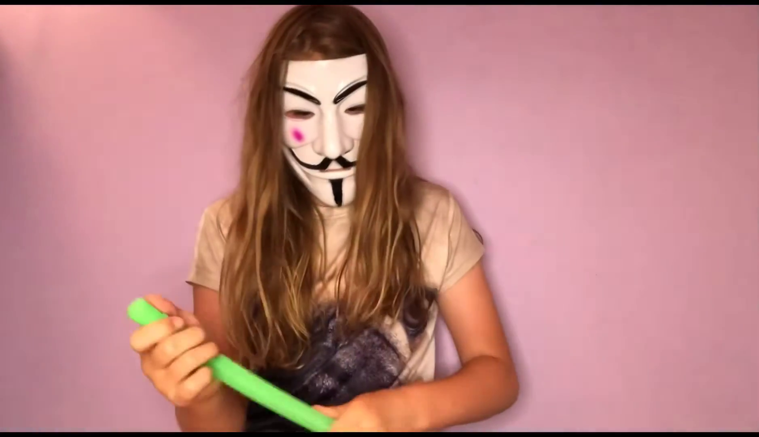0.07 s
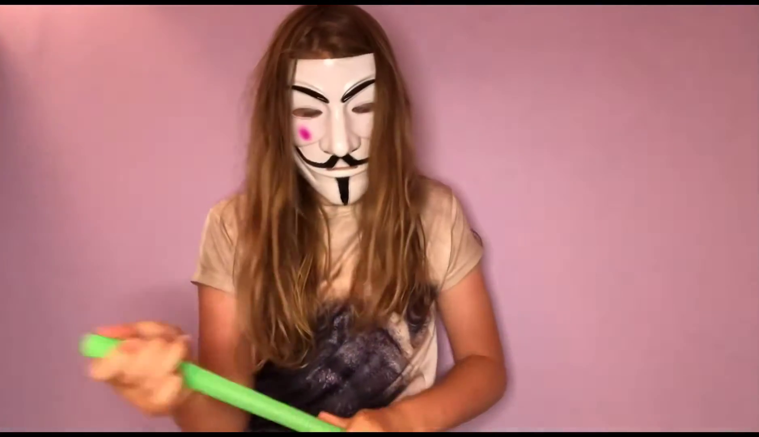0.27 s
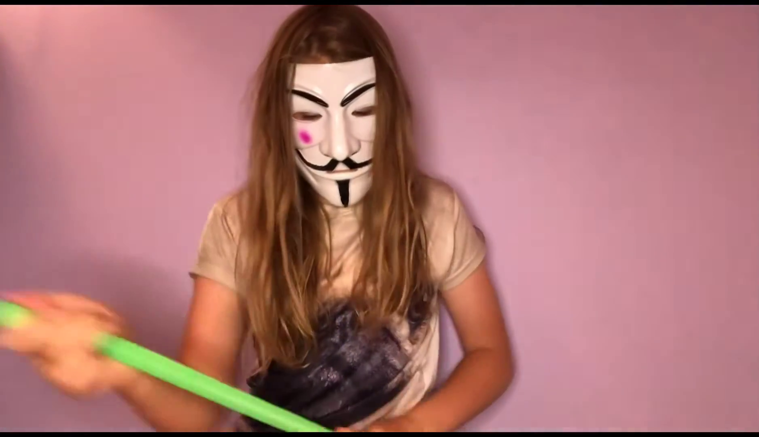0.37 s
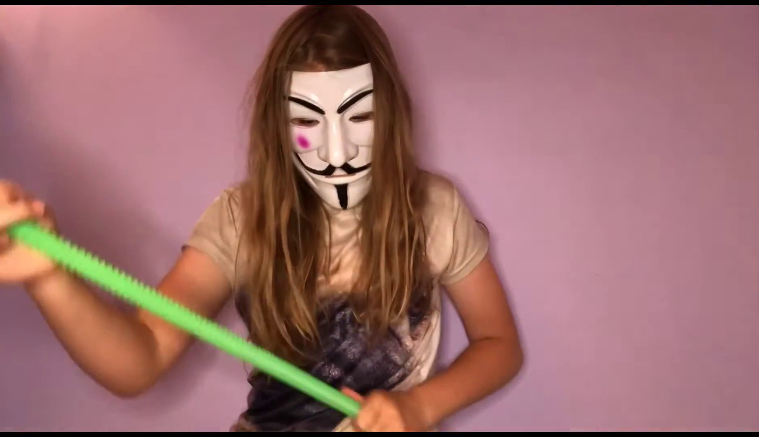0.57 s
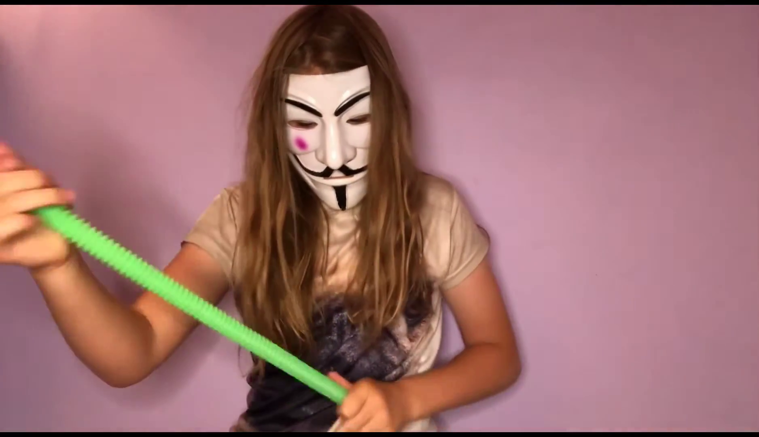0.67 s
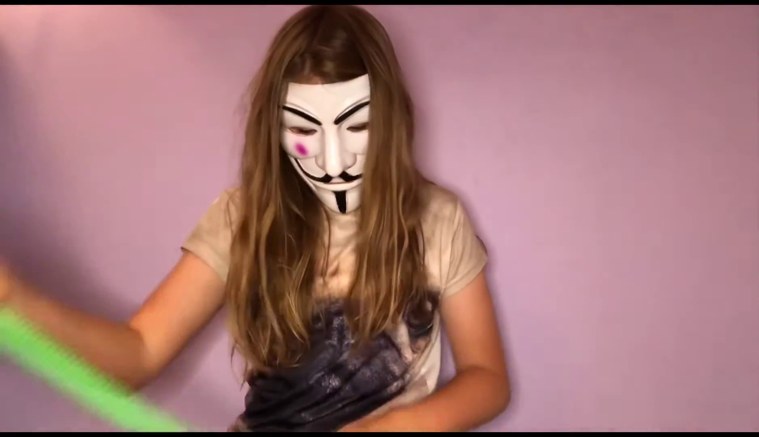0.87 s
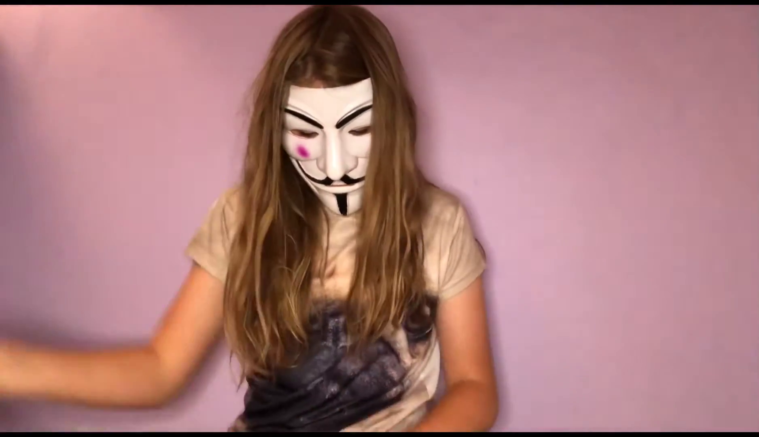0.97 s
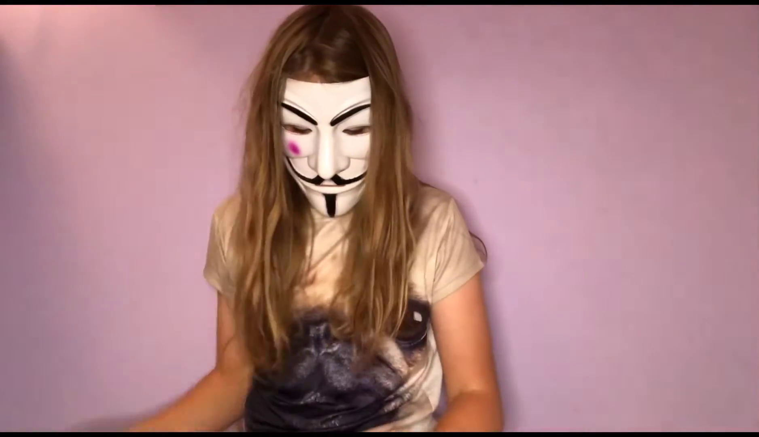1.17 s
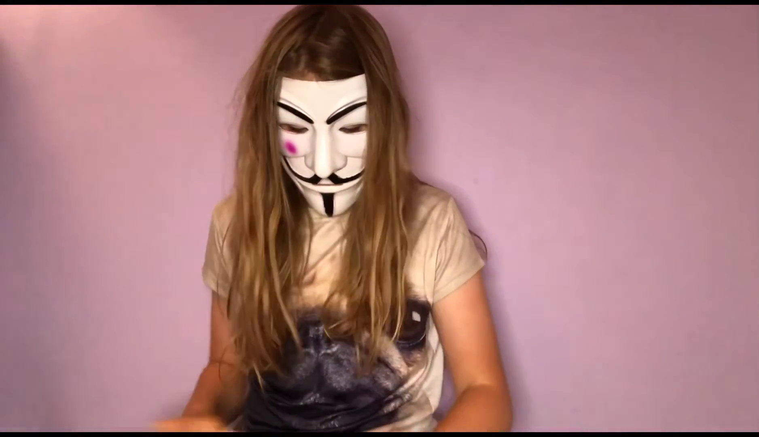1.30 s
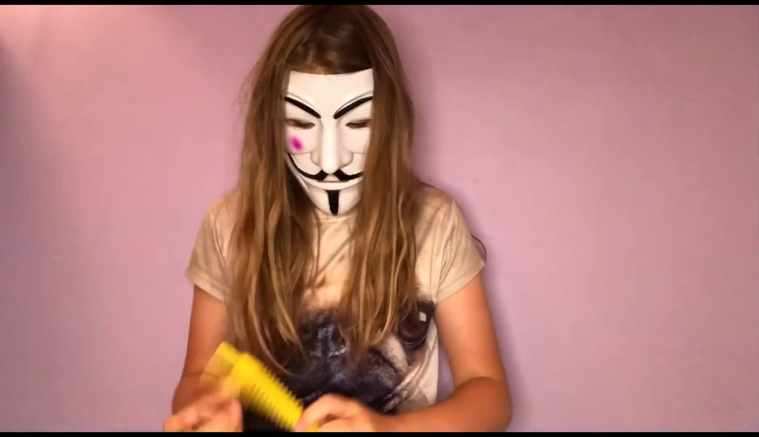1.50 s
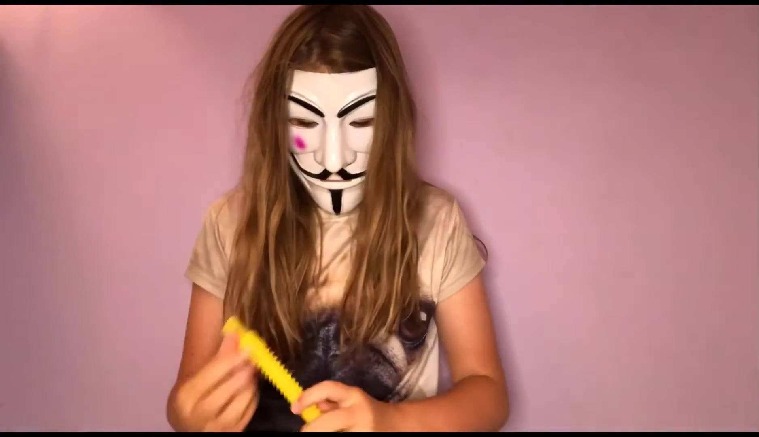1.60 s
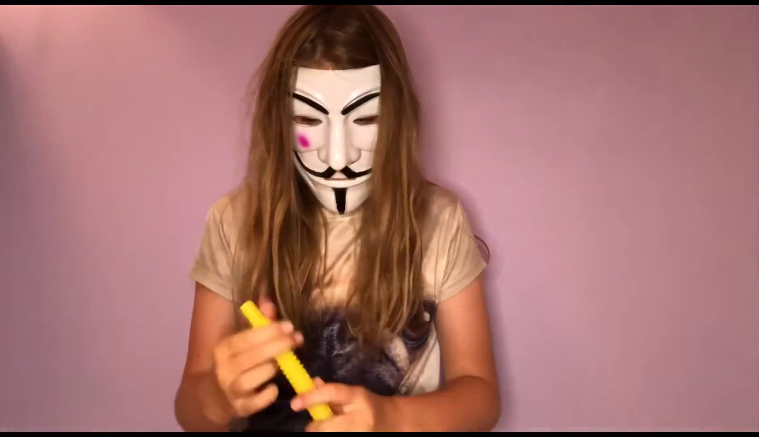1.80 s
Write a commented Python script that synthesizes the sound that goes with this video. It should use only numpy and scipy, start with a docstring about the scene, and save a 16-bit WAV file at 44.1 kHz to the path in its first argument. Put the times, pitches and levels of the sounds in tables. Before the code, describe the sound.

A corrugated plastic tube is yanked open with a fast ratchet and a pop, then faint taps.

```python
"""Small room: a pleated plastic tube is yanked open. Its pleats snap out in a fast ratchet, and each
snap kicks the air column inside, whose pitch falls as the tube lengthens. One late pleat pops alone.
Hands then put the tube down and pick up another: faint taps and rubs. Mains hum and hiss throughout."""
import sys
import numpy as np
from scipy import signal
from scipy.fft import rfft, irfft
from scipy.io import wavfile
from scipy.ndimage import uniform_filter1d

SR = 44100
rng = np.random.default_rng(int(sys.argv[2]) if len(sys.argv) > 2 else 0)


def unload_wav(signal):
    """Save mono or channel-first audio to the path in sys.argv[1] as 16-bit WAV at rate SR, clipped to [-1, 1]."""
    wavfile.write(
        sys.argv[1],
        SR,
        np.round(np.clip(np.atleast_2d(signal).T, -1, 1) * 32767).astype(np.int16),
    )


N = 81585
T = np.arange(N) / SR

# pleats snapping out: t/s, crack level/dB, crack f/Hz, kick to the air column/dB
SNAPS = [(0.2339, 0, 3950, -9.5), (0.2377, -3.5, 3947, -20.5), (0.2508, -15, 2600, 2),
         (0.2538, -16, 2400, -1), (0.2600, -3, 4196, -12.5), (0.2713, -1.5, 3858, -8),
         (0.2755, 2.5, 4793, -8), (0.2796, -3, 4000, -18.5), (0.2835, -7.5, 3890, -16.5),
         (0.288, -10, 4424, 2.5), (0.2903, 0.5, 3930, -1), (0.2928, -5.5, 3970, -6.5),
         (0.3028, 1.5, 4400, -11.5), (0.3140, -6.5, 3882, 8), (0.3194, 2.5, 5600, -9.5),
         (0.3226, -4.5, 5500, -20), (0.3343, 1, 4200, -12), (0.3377, 0.5, 3618, -10),
         (0.3478, -4, 4380, -5.5), (0.3513, -5.5, 3794, -3), (0.3577, -7.5, 3962, -9), (0.364, -9, 3500, 3),
         (0.3665, -4.5, 3651, 2.5), (0.371, 1.5, 3843, -2), (0.3727, 0.5, 3970, -17.5),
         (0.3780, -14, 7950, -15), (0.3811, -1.5, 5022, -19), (0.3879, -10, 4810, -22.5),
         (0.3931, -12.5, 3940, -13.5), (0.3990, -4, 5253, -5), (0.4015, -8, 3510, -0.5),
         (0.4230, -15, 3440, -5.5)]


def from_db(db):
    """Decibels to gain."""
    return 10 ** (np.asarray(db) / 20)


def at_hz(points, hz):
    """Read a table on a log-frequency axis."""
    f, values = np.transpose(points)
    return np.interp(np.log(np.maximum(hz, 1)), np.log(f), values)


def colour(x, points):
    """Minimum-phase filter from a table of f/Hz, gain/dB."""
    size = 4096
    log_gain = np.log(from_db(at_hz(points, np.abs(np.fft.fftfreq(size, 1 / SR)))))
    response = np.fft.ifft(np.exp(signal.hilbert(log_gain).conj())).real
    return signal.fftconvolve(x, response[:size // 2])[:len(x)]


def band(x, low_hz, high_hz, order):
    """Butterworth band-pass."""
    return signal.sosfilt(signal.butter(order, [low_hz, high_hz], "band", fs=SR, output="sos"), x)


def low_cut(x, hz):
    """Butterworth high-pass."""
    return signal.sosfilt(signal.butter(3, hz, "high", fs=SR, output="sos"), x)


def decay(t, t60_s):
    """Exponential, 60 dB down at t60_s."""
    return np.exp(-np.log(1000) * t / t60_s)


def unit_energy(x):
    """Scale to the energy of a unit click."""
    return x / np.sqrt(np.sum(x ** 2))


def burst(t60_s):
    """Decaying noise of unit energy."""
    t = T[:SR // 5]
    return unit_energy(rng.standard_normal(len(t)) * decay(t, t60_s))


def add(out, start_s, sound):
    """Mix a sound in at start_s."""
    i = int(start_s * SR)
    out[i:i + len(sound)] += sound[:N - i]


def hum_and_hiss():
    """Steady mains hum and noise floor."""
    hiss_colour = [(25, -3.5), (60, -1.5), (150, 6.5), (300, 0.5), (600, -1.5), (1200, -10.5), (1900, -8),
                   (2600, -12.5), (5000, -13), (7000, -12.5), (10000, -21.5), (16000, -15.5)]  # noise spectrum: f/Hz, gain/dB
    hum_hz, hum_db, hiss_db = 99.6, -59.5, -66.5
    hiss = colour(rng.standard_normal(N + SR), hiss_colour)[SR:]
    return from_db(hiss_db) * hiss / hiss.std() + from_db(hum_db) * np.sin(2 * np.pi * hum_hz * T)


def rubs():
    """Skin slides on the pleats: soft swells of grainy noise."""
    strokes = [(0.019, 0.024, -65.5), (1.282, 0.016, -60), (1.454, 0.052, -67.5), (1.553, 0.041, -57),
               (1.667, 0.052, -65), (1.795, 0.032, -58.5)]  # slides: centre t/s, half length/s, level/dB
    rub_colour = [(150, -5), (400, -2), (700, -9.5), (2000, -5.5), (4000, -3.5), (8000, -10.5),
                  (16000, -13.5)]  # friction spectrum: f/Hz, gain/dB
    grain_db = 5
    grains = colour(rng.standard_normal(N) * from_db(grain_db * rng.standard_normal(N)), rub_colour)
    pressure = sum(from_db(db) * np.exp(-((T - mid_s) / half_s) ** 2) for mid_s, half_s, db in strokes)
    return pressure * grains / grains.std()


def crack(hz, q, wall_db, wall_t60_s):
    """A pleat flips: a click and a brief wall rattle ring its resonance for a few cycles."""
    rattle = from_db(wall_db) * burst(wall_t60_s)
    click = signal.unit_impulse(len(rattle))
    b, a = signal.iirpeak(hz, q, fs=SR)
    ring = unit_energy(signal.lfilter(b, a, signal.lfilter(b, a, click + rattle)))
    return ring + from_db(-4.5) * click + from_db(-12) * rattle


def ratchet():
    """Pleats crack in a fast run, with small random slips in between."""
    crack_colour = [(100, -11), (250, -9.5), (550, -8), (1000, 1.5), (2000, 12), (3200, 4.5), (5500, -0.5),
                    (8000, 5.5), (12000, 0.5), (16000, -12.5)]  # spectrum of the plastic: f/Hz, gain/dB
    slips_per_s, pull_end_s = 600, 0.44
    out = np.zeros(N)
    for start_s, db, hz, _ in SNAPS:
        add(out, start_s, from_db(db + 4) * crack(hz, q=1.6, wall_db=-1.5, wall_t60_s=0.0083))
    pulling = (T > SNAPS[0][0]) & (T < pull_end_s)
    slips = pulling * (rng.random(N) < slips_per_s / SR) * rng.choice([-1, 1], N)
    slip_db = -17 + 3 * rng.standard_normal(N)
    out += band(slips * from_db(slip_db), 800, 3900, order=1)
    return low_cut(colour(out, crack_colour), hz=420)  # the thin tube radiates little bass


def shudder(line_width_hz=5):
    """The tube shudders, so its pitch is unsteady: a smoothed random walk of phase/rad."""
    step_rad = np.sqrt(2 * np.pi * line_width_hz / SR)
    return uniform_filter1d(np.cumsum(step_rad * rng.standard_normal(N)), size=128)


def air_column():
    """Snaps kick the overtones of the open pipe, which glide down with its hollow lowest note."""
    glide = [(0.235, 463.3), (0.258, 453.5), (0.294, 422.8), (0.318, 398.5), (0.34, 382.7), (0.37, 352.2),
             (0.402, 323.5), (0.44, 308), (0.5, 296.4)]  # lowest resonance as the tube lengthens: t/s, f/Hz
    hollow = [(0.233, -67), (0.239, -37.5), (0.272, -41), (0.281, -31.5), (0.316, -30), (0.343, -42.5),
              (0.358, -35), (0.378, -29), (0.39, -45.5), (0.408, -27), (0.435, -49), (0.55, -53.5)]  # lowest resonance, pumped by the pull: t/s, level/dB
    overtones_db = [-25, -22.5, -18.5, -25.5, -28, -31, -30.5, -29.5, -32, -39]  # harmonics 2, 3, ...: level/dB
    radiation = [(620, -15), (760, -2), (900, -9.5), (1150, 4.5), (1620, 3.5), (1800, -7.5), (2250, 7),
                 (5000, -1)]  # how strongly the tube radiates: f/Hz, gain/dB
    swell_s, kick_spread_db = 0.0012, 2
    snap_s, _, _, kick_db = np.transpose(SNAPS)
    pitch_hz = np.interp(T, *np.transpose(glide))
    phase = 2 * np.pi * np.cumsum(pitch_hz) / SR
    hollow_db = np.interp(T, *np.transpose(hollow), left=-np.inf, right=-np.inf)
    out = from_db(hollow_db) * np.sin(phase + shudder())
    swell_pole = np.exp(-1 / (swell_s * SR))  # the air takes a moment to speak
    for k, db in enumerate(overtones_db, 2):
        t60_s = 0.071 * (2 / k) ** 0.83  # higher overtones die sooner
        scatter_db = kick_spread_db * rng.standard_normal(len(snap_s))  # varies pleat by pleat
        kicks = np.zeros(N)
        kicks[(snap_s * SR).astype(int)] = from_db(kick_db + scatter_db)
        energy = signal.lfilter([1], [1, -decay(2 / SR, t60_s)], kicks ** 2 + 1e-18)
        envelope = signal.lfilter([1 - swell_pole], [1, -swell_pole], np.sqrt(energy))
        tone = np.sin(k * phase + shudder() + rng.uniform(0, 2 * np.pi))
        out += envelope * from_db(db + at_hz(radiation, k * pitch_hz)) * tone
    return out


def taps():
    """Fingers and plastic touch lightly: each a short ring, a knock and a tick."""
    touches = [(0.470, 0.058, 163.4, -36, -37, -43), (0.744, 0.057, 1690, -56, -33.5, -31.5),
               (0.947, 0.052, 357, -54.5, -43.5, -41), (1.067, 0.018, 7050, -49, -27.5, -33),
               (1.076, 0.051, 438, -50, -41.5, -38), (1.239, 0.053, 387, -52, -48, -50),
               (1.340, 0.024, 1535, -64, -40.5, -40), (1.346, 0.05, 425.4, -46, -39.5, -39.5),
               (1.438, 0.025, 1454, -82, -33.5, -32.5), (1.47, 0.082, 3490, -50, -45, -37),
               (1.512, 0.013, 1496, -54, -20, -46), (1.514, 0.043, 956, -43, -56, -32.5),
               (1.521, 0.029, 876, -35, -22, -24), (1.526, 0.011, 540, -43, -37, -25.5),
               (1.534, 0.059, 864, -38, -34.5, -54), (1.542, 0.031, 3540, -51, -37, -42),
               (1.558, 0.04, 3520, -53, -36.5, -54), (1.577, 0.015, 960, -50, -37, -49),
               (1.635, 0.0075, 2500, -49, -32, -25), (1.658, 0.012, 1390, -45.5, -31, -32),
               (1.674, 0.067, 199, -40.5, -35.5, -46), (1.76, 0.034, 986, -53.5, -32.5, -34)]  # contacts: t/s, noise t60/s, ring f/Hz, ring/dB, knock/dB, tick/dB
    noise_bands = [(650, 2510), (3500, 11500)]  # knock, then tick: low f/Hz, high f/Hz
    rise_cycles = 0.37
    out, t = np.zeros(N), T[:SR // 4]
    for start_s, t60_s, hz, ring_db, *noise_db in touches:
        envelope = decay(t, t60_s=0.027) * (1 - np.exp(-t * hz / rise_cycles))
        add(out, start_s, from_db(ring_db) * envelope * np.sin(2 * np.pi * hz * t))
        for db, (low_hz, high_hz) in zip(noise_db, noise_bands):
            add(out, start_s, from_db(db) * unit_energy(band(burst(t60_s), low_hz, high_hz, order=3)))
    return out


def pop(start_s):
    """The last pleat flips alone, a little duller than the rest."""
    pop_colour = [(150, -34), (500, 9.5), (1200, -7.5), (3000, 9), (7600, 1.5), (9000, -8.5), (16000, -5)]  # spectrum of this pleat: f/Hz, gain/dB
    snap = crack(hz=3037, q=0.5, wall_db=0, wall_t60_s=0.028)
    out = np.zeros(N)
    add(out, start_s, from_db(-1.5) * colour(snap, pop_colour))
    return low_cut(out, hz=460)  # one pleat is too small to thump


def long_tube_ring(start_s):
    """The pop rings the air column at full length."""
    modes = [(291, -34), (584, -38.5), (872, -38), (1491, -33), (1800, -25), (2412, -33), (2735, -32),
             (3031, -26.5)]  # air resonances: f/Hz, level/dB
    damping = [(291, .15), (1800, .11), (3000, .08)]  # their decay: f/Hz, t60/s
    out = np.zeros(N)
    for hz, db in modes:
        ring = from_db(db) * np.sin(2 * np.pi * hz * T) * decay(T, at_hz(damping, hz))
        add(out, start_s, low_cut(ring, hz / 2))
    return out


def room(x):
    """Dense early reflections off walls and table, then a tail that dies sooner in the treble."""
    reverb_time = [(150, .45), (400, .44), (1200, .46), (3000, .44), (6000, .42), (10000, .35),
                   (15000, .31)]  # tail decay: f/Hz, t60/s
    room_colour = [(100, -18), (400, 7.5), (1200, -1.5), (3500, -6), (7000, -7), (15000, -7.5)]  # spectrum of the reflections: f/Hz, gain/dB
    onset_s = 0.0018
    t, edges_hz = T[:SR], np.geomspace(60, 18000, 11)
    white, hz = rfft(rng.standard_normal(SR)), np.arange(SR // 2 + 1)
    tail = np.zeros(SR)
    for low, high in zip(edges_hz, edges_hz[1:]):
        noise = irfft(white * ((hz >= low) & (hz < high)))
        tail += noise * decay(t, at_hz(reverb_time, np.sqrt(low * high)))
    response = from_db(-12) * unit_energy(tail)
    add(response, 0, burst(t60_s=0.17))  # early reflections
    response *= 1 - np.exp(-(t / onset_s) ** 2)
    return colour(signal.fftconvolve(x, response)[:N], room_colour)


def scene():
    """Tube and hands in the room, mono."""
    pop_s = 0.5532
    contacts = ratchet() + taps() + rubs()
    last_pleat = pop(pop_s)
    air = air_column() + long_tube_ring(pop_s)
    reflections = room(contacts + 0.79 * last_pleat + 0.52 * air)
    return (contacts + last_pleat + air + reflections + hum_and_hiss())[None]


def record(dry):
    """Soft clip of the loudest cracks, then a steep low-pass."""
    ceiling, cutoff_hz = 0.85, 16000
    rounded = dry / (1 + (dry / ceiling) ** 4) ** 0.25
    return signal.sosfilt(signal.ellip(10, .1, 70, cutoff_hz, fs=SR, output="sos"), rounded)


dry = scene()
out = record(dry)
unload_wav(out)
```